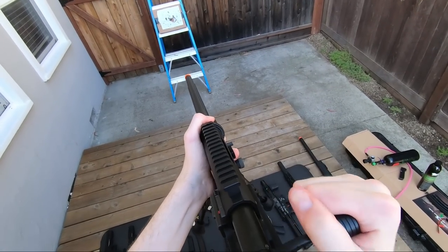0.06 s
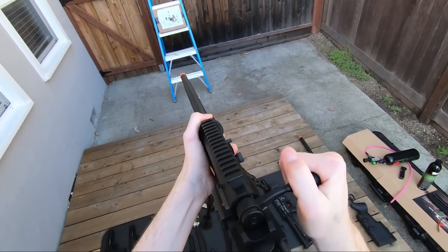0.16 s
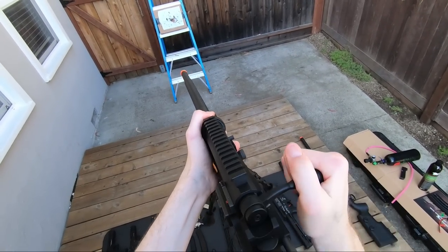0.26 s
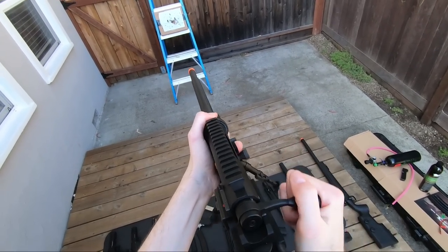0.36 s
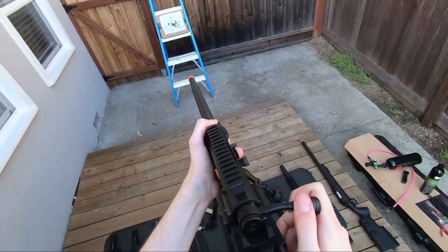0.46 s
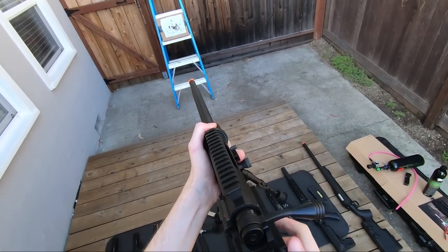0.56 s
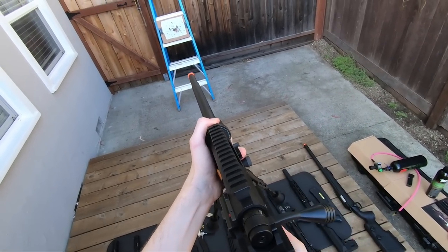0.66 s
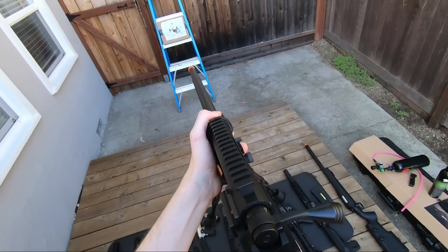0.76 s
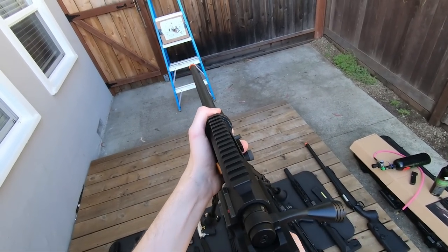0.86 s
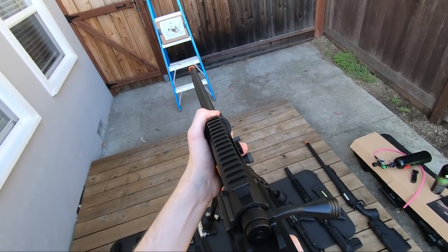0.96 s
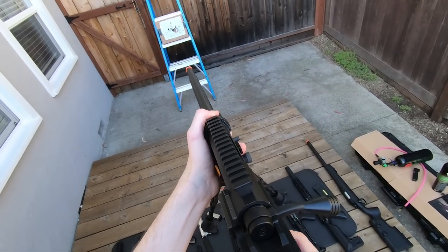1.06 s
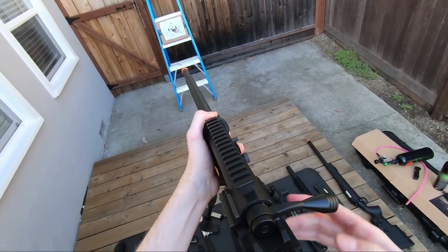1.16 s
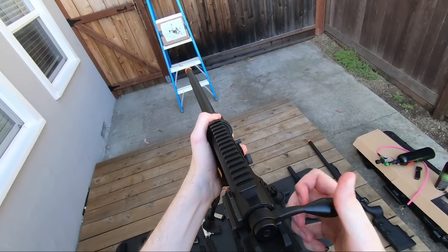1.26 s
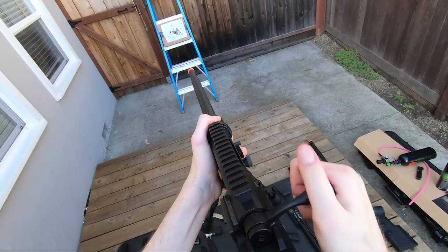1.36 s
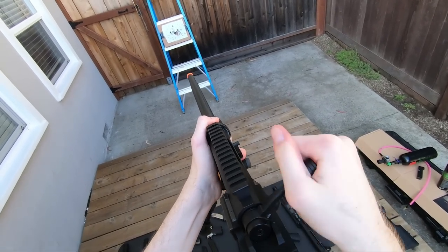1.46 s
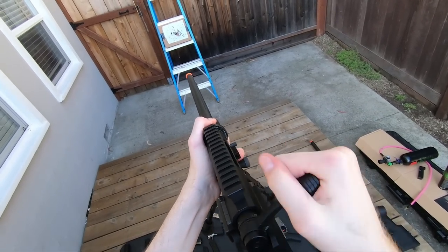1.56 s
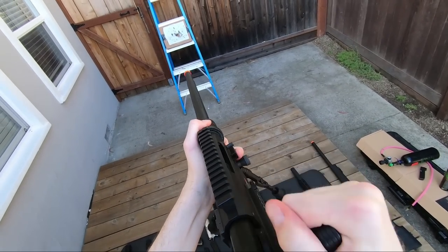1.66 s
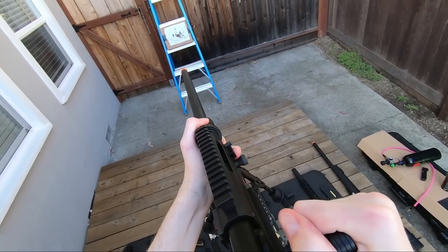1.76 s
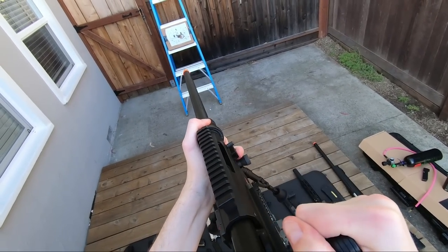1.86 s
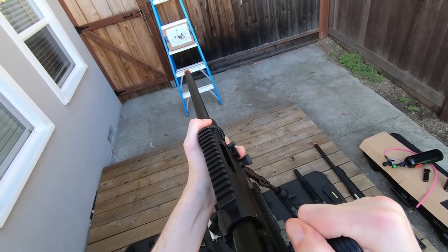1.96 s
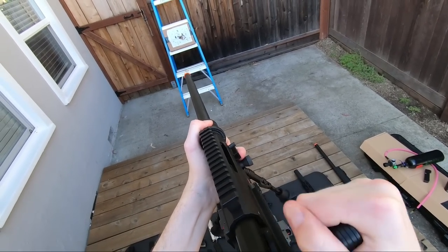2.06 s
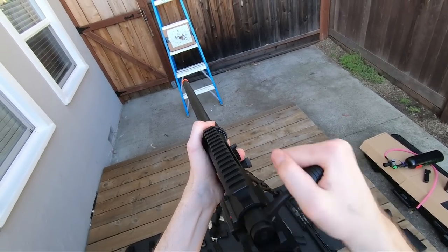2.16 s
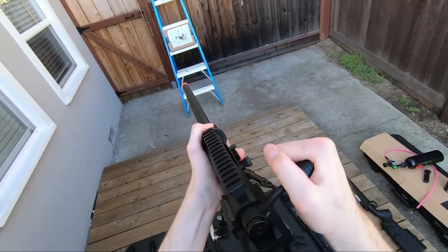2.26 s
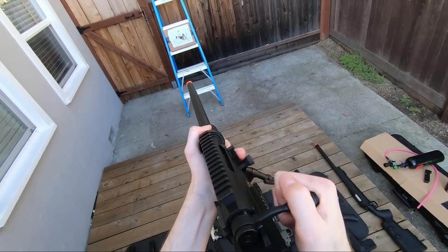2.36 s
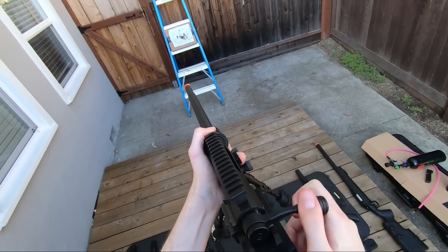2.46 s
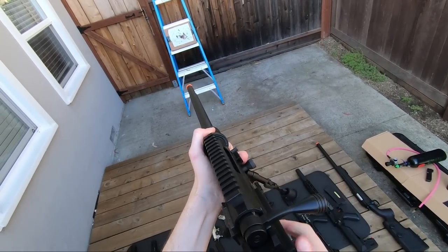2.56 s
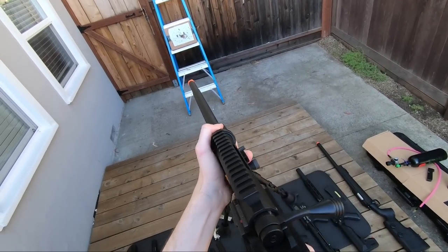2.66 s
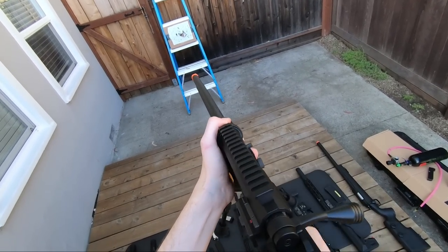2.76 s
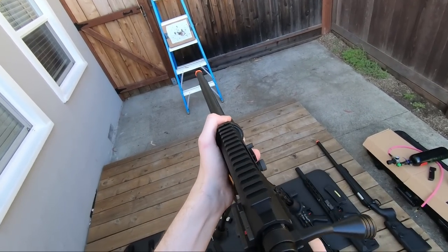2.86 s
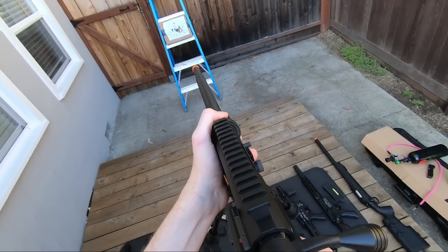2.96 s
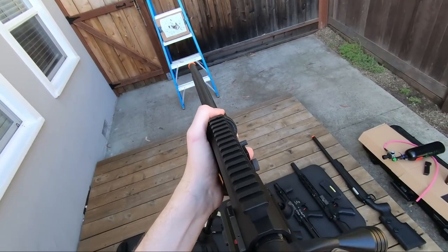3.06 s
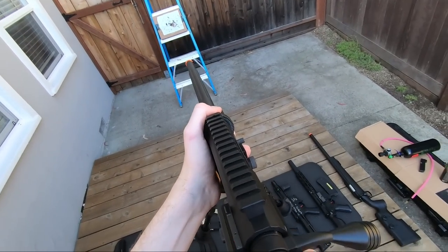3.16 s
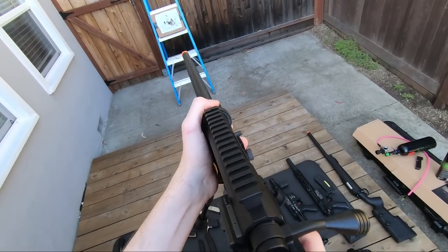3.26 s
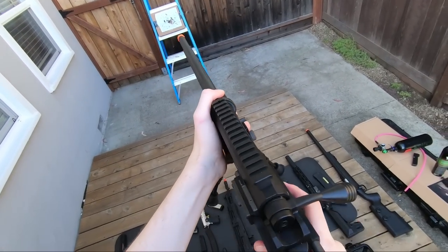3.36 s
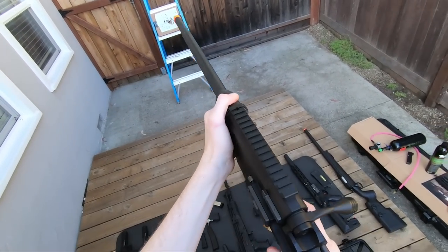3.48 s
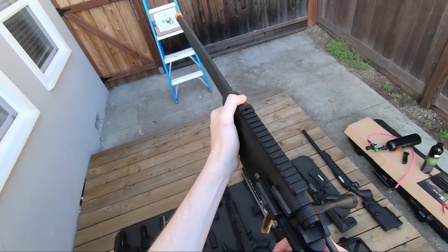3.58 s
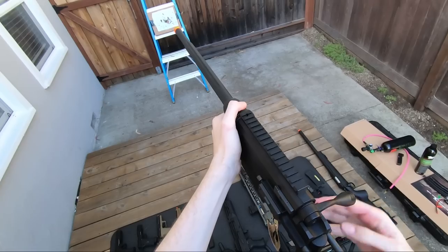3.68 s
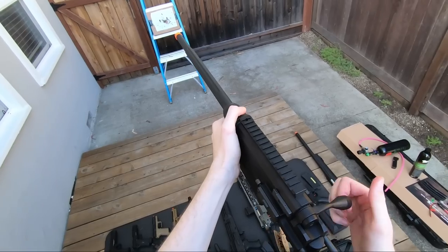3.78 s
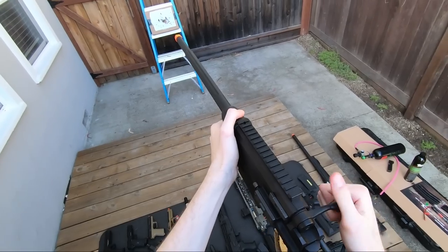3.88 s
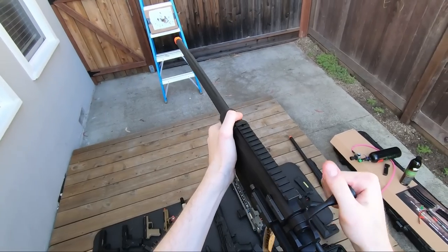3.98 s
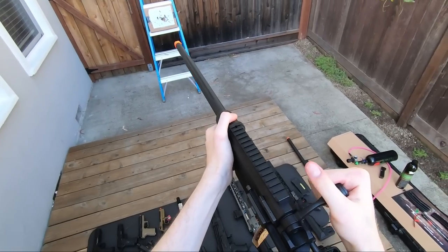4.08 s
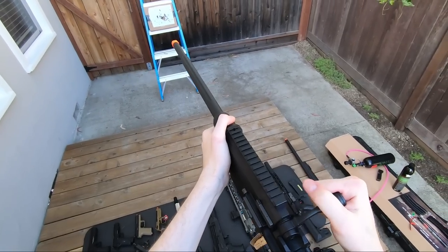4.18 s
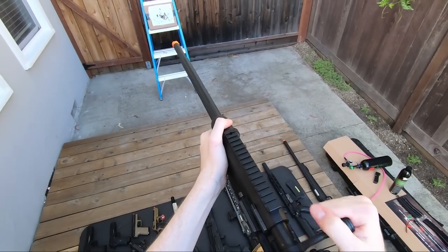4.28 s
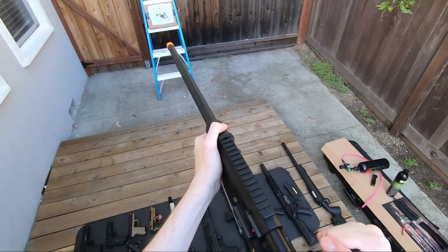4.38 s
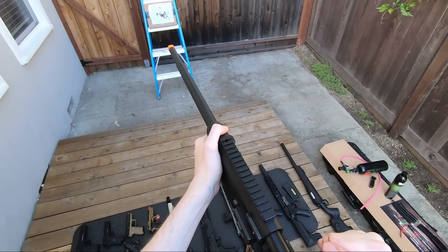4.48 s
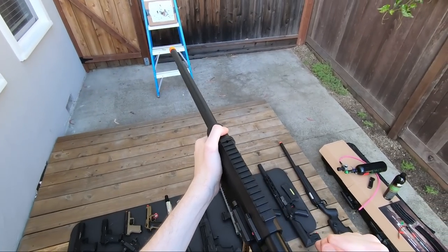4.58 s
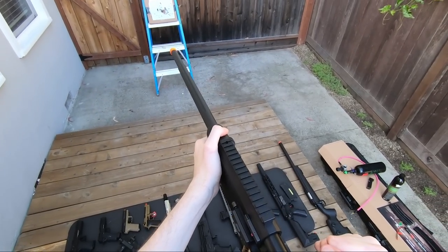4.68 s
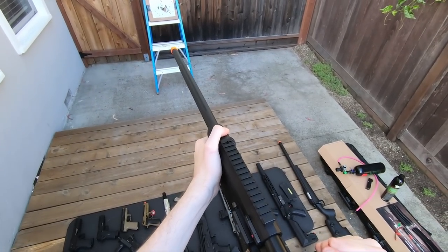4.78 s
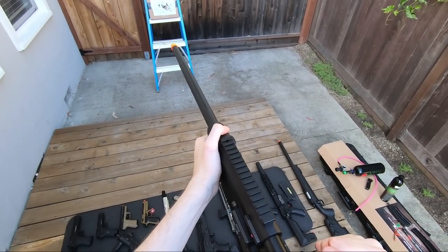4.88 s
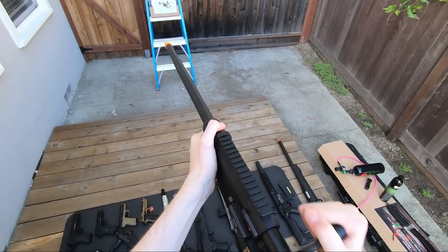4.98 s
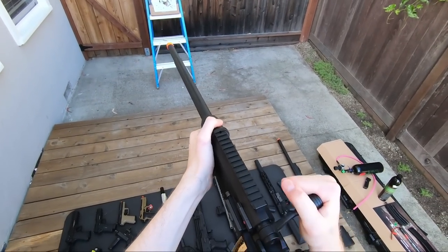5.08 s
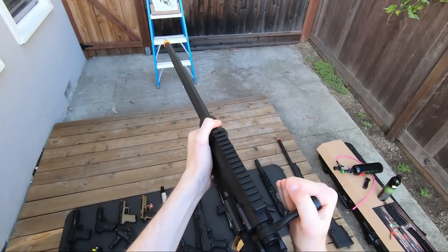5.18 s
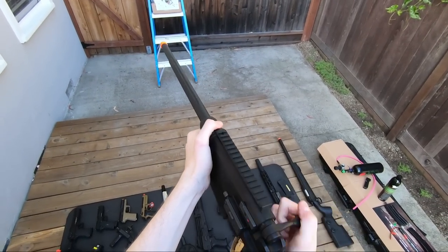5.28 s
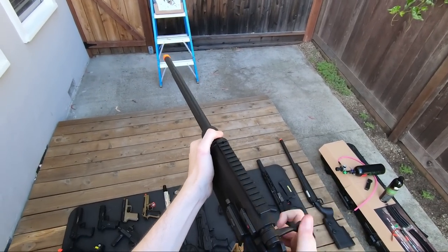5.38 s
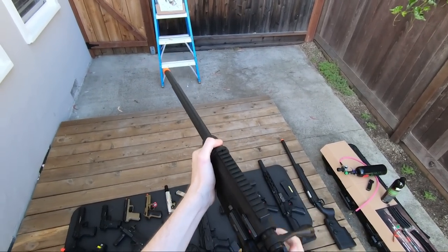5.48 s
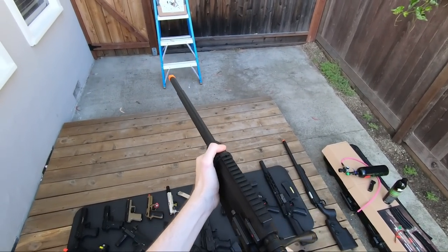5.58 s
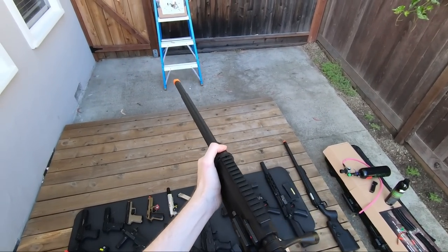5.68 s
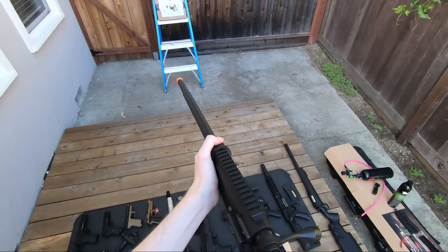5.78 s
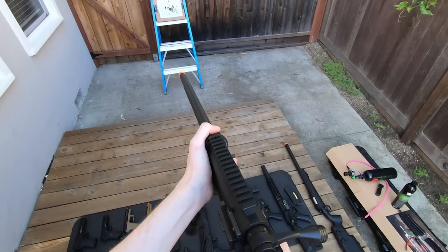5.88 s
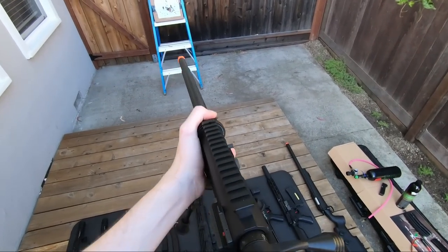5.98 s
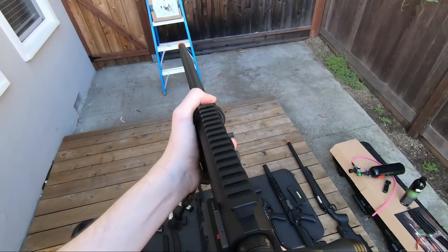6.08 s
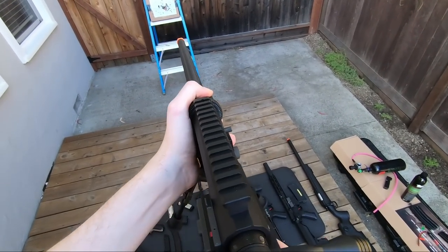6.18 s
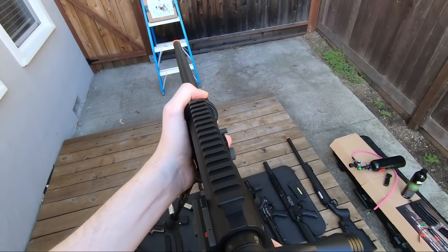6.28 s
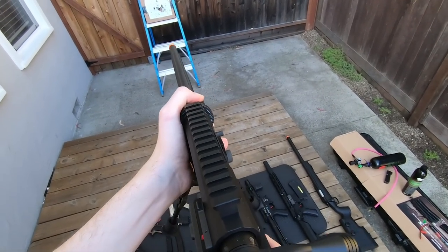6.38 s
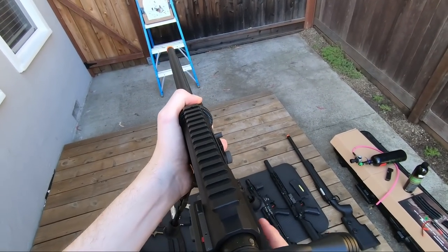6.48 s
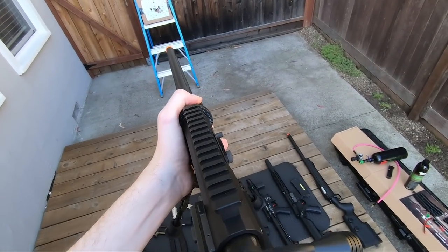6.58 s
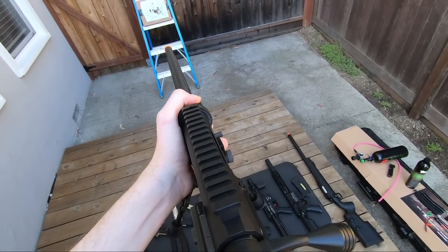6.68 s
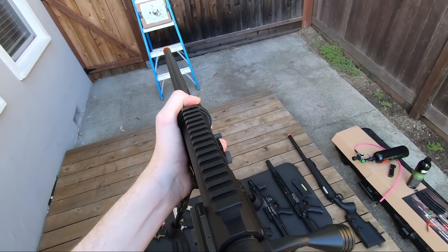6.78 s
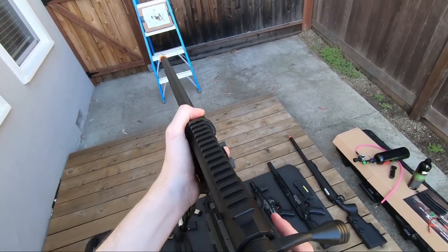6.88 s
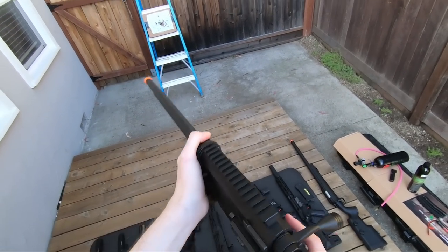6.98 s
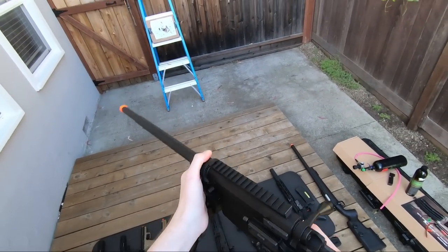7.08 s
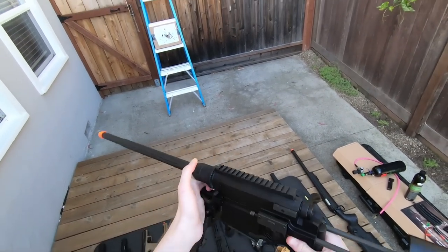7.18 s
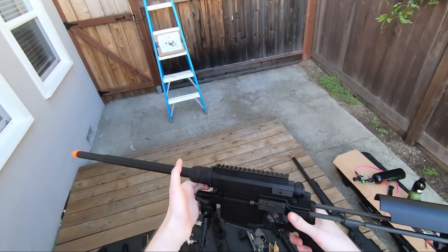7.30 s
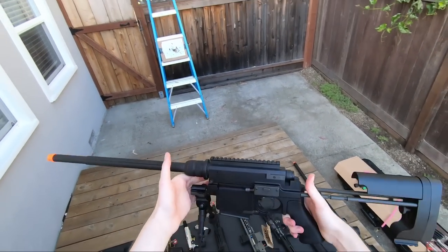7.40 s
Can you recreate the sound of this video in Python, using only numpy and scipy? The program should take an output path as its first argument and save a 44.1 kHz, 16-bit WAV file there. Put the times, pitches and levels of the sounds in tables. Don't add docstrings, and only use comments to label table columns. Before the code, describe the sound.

Close bolt knocks, clicks and slams, then three loud hollow cracks with brief air rush, short yard echoes, and faint fading traffic rumble.

```python
import sys
import numpy as np
from scipy import signal
from scipy.fft import rfft, irfft, next_fast_len
from scipy.io import wavfile
from scipy.ndimage import uniform_filter1d

SR = 44100
rng = np.random.default_rng(int(sys.argv[2]) if len(sys.argv) > 2 else 0)


def to_wav(sig):
    pcm = np.clip(np.atleast_2d(sig), -1, 1) * 32767
    pcm = np.round(pcm).astype(np.int16)
    wavfile.write(sys.argv[1], SR, pcm.T)


def gain_from_db(level_db):
    decades = np.asarray(level_db, float) / 20
    return 10 ** decades


N = 328096
LEFT_RIGHT = np.array([[1], [-1]])

# slam_s, sear_lead_s, strength_db
SHOTS = [
    (1.0289, 0.026, -1),
    (3.2029, 0.022, 0),
    (6.691, .0214, -0.5),
]
# peak_db, ring_hz, stock_db, steel_db, left_minus_right_db
SEAR = (-12, 3200.5, -11, -13, -2)
# lag_s, peak_db, ring_hz
SEAR_PIN = (0.0012, -11, 5000)
# after_slam_s, peak_db, stock_db, steel_db
RATTLE = [
    (-.0105, -33.5, 14.5, -4.5),
    (-.0082, -34, 20, -11),
    (-.0055, -8.5, -0.5, -13),
    (-.0037, -7, -7.5, -7.5),
    (-.0022, -12.5, -8, -8),
    (.0006, 3.5, -14, -13.5),
    (.003, -8.5, -10.5, -5),
    (.0052, -23.5, -8, -6),
]
RATTLE_HZ, REBOUND_PITCH = 3400, 0.58
# start_after_slam_s, end_after_slam_s, start_db, end_db, steel_db
PISTON_RUN = [
    (-.018, -.006, -37.5, -32, -9),
    (-.006, 0.00015, -19.5, -19.5, 13.5),
]
# after_slam_s, width_s, signed_height
POP = [(-.0101, .0008, .12), (-.0092, .0008, -.2), (-.0084, .0007, .08), (-.0077, .0007, -.1),
       (-.0055, .001, .2), (-.004, .001, -.2), (.0007, .0007, .55), (.0013, .0007, -.8),
       (.002, .0013, 1.35), (.0041, .0014, -.85), (.0051, .001, -.25)]
HALF_PULSE = 220
# lag_s, level_db
RETURNS = [(.0037, -21.5), (.0095, -11.5), (0.0152, -12.5), (0.0238, -14.5), (.031, -19), (.039, -23.5),
           (.047, -25.5), (.056, -25.5), (.064, -27), (.074, -29)]
RETURN_CUT_HZ = 340
BLAST_DB, BLAST_T60_S = -26.5, 0.39
BLAST_LOW_FADE_DB_PER_S = 58.5

# start_s, peak_db, ring_hz, steel_db
KNOCKS = [(0.1139, -21, 3070, -26), (0.1998, -18, 2620, -6), (0.203, -13.5, 1300, -27.5),
          (0.2382, -16.5, 2780, -17), (0.428, -18.5, 2930, -19), (0.4338, -14, 2370, -18),
          (0.4578, -14.5, 1880, -24), (0.4612, -26, 2290, -25.5), (0.4929, -29.5, 4230, -18),
          (1.388, -37.5, 3000, -4), (2.515, -36, 3800, -1.5), (4.399, -26, 3010, -13.5),
          (4.411, -26.5, 3400, -21), (6.416, -58.5, 3900, -14), (0.6167, -11.5, 2290, -16.5),
          (1.6638, -8, 2650, -6.5), (1.7116, -10.5, 3423, -9), (1.721, -17, 2960, -16.5),
          (2.458, -9, 3000, -20), (2.466, -9.5, 1940, -21.5), (2.4865, -17, 1890, -21),
          (4.0708, -9, 3120, -22.5), (4.0776, -15.5, 2090, -26), (4.3202, -8.5, 2970, -15.5),
          (5.0162, -18.5, 3920, -20), (5.3569, -7, 2970, -22), (5.5945, -11, 2900, -18)]
# start_s, peak_db, ring_hz, steel_db
CLICKS = [(0.1226, -1.5, 3600, -16.5), (0.4369, -12.5, 2158, -22), (1.1604, -18.5, 2960, -12),
          (1.705, -20.5, 3277, 2), (1.7281, -11.5, 2897, -17.5), (1.7457, -22.5, 3103, -15),
          (1.7524, -8.5, 2530, -12), (1.7572, -11.5, 2750, -17), (1.9615, -2, 3523, -23.5),
          (1.9651, -7.5, 2870, -21), (1.971, -8.5, 3644, -15.5), (2.146, -18.5, 3320, -16.5),
          (2.1507, 0, 3164, -20), (3.3423, -15.5, 3400, -20), (4.364, -20, 3647, -2),
          (4.3707, -6, 3250, -13), (4.431, -21, 2480, -29), (4.4395, -12.5, 3520, -19),
          (4.4888, -4.5, 3480, -17.5), (4.4921, -7, 3120, -22), (4.4935, -2, 3168, -21),
          (5.3898, -10, 1960, -18.5), (5.019, -2.5, 3230, -16), (5.3615, -6, 2330, -33),
          (5.3645, -12, 2430, -17.5), (6.6491, -46, 3530, -6.5), (6.661, -48.5, 3573, 1),
          (6.8885, -25.5, 3983, -7.5)]
# start_s, peak_db, ring_hz, stock_thud_lag_s
SLAMS = [
    (0.246, -1, 2800, .006),
    (2.2598, -2.5, 2983, 0.0064),
    (5.111, -1.5, 2890, .008),
]
# start_s, peak_db, ring_hz
BOUNCES = [(0.1996, -23, 5500), (0.236, -17.5, 2700), (1.665, -19.5, 1500), (1.7125, -21.5, 1400),
           (0.1254, -14.5, 2700), (0.2554, -14.5, 3300), (0.462, -26.5, 3000), (0.6268, -23.5, 3000),
           (1.714, -17, 2990), (1.7188, -20, 1800), (1.7314, -15, 3530), (1.739, -14, 2900),
           (1.7475, -22, 3470), (1.7603, -17.5, 2860), (1.963, -5.5, 2780), (1.9683, -8.5, 2900),
           (1.9718, -15.5, 1700), (1.9747, -17, 2890), (1.977, -14, 2990), (1.9872, -27, 3320),
           (1.9952, -25.5, 3360), (2.144, -23.5, 2130), (2.214, -29, 2090), (2.216, -23, 1280),
           (2.22, -18.5, 2430), (2.2246, -21, 3530), (2.2469, -27, 2450), (2.25, -25, 3700),
           (2.2696, -19.5, 1270), (2.2738, -25, 3080), (2.4596, -11.5, 3100), (2.4637, -16.5, 2560),
           (2.4668, -21, 3900), (3.3443, -26, 2000), (2.2597, -5.5, 1900), (5.1116, -10, 1700),
           (4.3206, -18, 1500), (1.6658, -16.5, 2300), (2.4879, -17, 1900), (4.4428, -19.5, 3190),
           (4.4462, -20.5, 3190), (4.497, -14, 3080), (4.503, -20, 2970), (5.0659, -21.5, 2520),
           (5.1165, -14, 1570), (5.123, -19.5, 3190), (5.3592, -10.5, 2900), (5.3742, -21.5, 1590),
           (5.3772, -27, 2670), (5.391, -19, 4200), (5.392, -22, 1770), (5.3947, -17.5, 1770),
           (5.404, -24, 3230)]
# start_s, peak_db, ring_hz, steel_db
TICKS = [(0.168, -46.5, 2070, -12), (0.537, -38, 3415, -17), (0.571, -31, 3660, -16),
         (0.6107, -27.5, 1880, -16), (1.398, -27, 2550, -19), (1.445, -32.5, 3100, -17),
         (1.493, -33.5, 4300, -3), (1.51, -30, 3260, -18.5), (1.606, -25.5, 1960, -29),
         (1.8123, -29.5, 3510, -3), (2.3778, -29, 3450, -8), (2.697, -38, 2960, -17.5),
         (3.4864, -37, 3330, -20), (3.5688, -30, 3370, -6.5), (3.6646, -26, 3120, -28.5),
         (3.7059, -37.5, 3090, -23), (3.947, -39.5, 2420, -21.5), (3.9537, -35, 2850, -17),
         (4.064, -26.5, 2950, -9.5), (4.1354, -32, 3480, -9), (5.0722, -32, 3140, -5),
         (5.2919, -45.5, 3000, -4.5), (5.3132, -30, 3500, -16), (5.682, -40.5, 2625, -19),
         (7.1065, -46.5, 4000, -23), (7.163, -49, 4050, -20), (6.415, -53.5, 4200, -18.5),
         (7.31, -34.5, 3180, -6.5), (7.3449, -37.5, 3800, -11), (7.3603, -46.5, 1690, -9),
         (7.386, -29, 1970, -17), (7.425, -37, 4430, -15)]
REBOUND_S, REBOUND_DB, REBOUND_HZ = .0017, -8, 3120
THUD_DB, THUD_HZ, THUD_STOCK_DB, THUD_STEEL_DB = -7.5, 2800, 4, -6
SLAM_STOCK_DB, SLAM_STEEL_DB = -7, -5
KNOCK_STOCK_DB, CLICK_STOCK_DB = -7.5, -16.5
BOUNCE_STOCK_DB, BOUNCE_STEEL_DB = -19, -20
HANDLE_PAN_DB = -1

# pitch_hz, width_hz, level_db
RECEIVER = [(1886, 67, -7), (2800, 38, -4.5), (2960, 16, -5.5), (3320, 140, -3.5), (3800, 41, -6.5),
            (4100, 36, -9.5), (4800, 49, -9), (6360, 120, -14.5), (9200, 46, -13.5)]
STOCK_HZ, STEEL_HZ = 894, 9200
# pitch_hz, width_hz, level_db
BOLT_MODES = [(8800, 120, 6), (9320, 100, 6), (9900, 100, 4.5)]

KNOCK_CHATTER_DB, CLICK_CHATTER_DB, SLAM_CHATTER_DB = -20.5, -30.5, -22.5
CHATTER_LAG_S, CHATTER_S, CHATTER_FALL_DB, CHATTER_BRIGHT_DB, CHATTER_PITCH = 0.0046, 0.043, 21.5, 5, 0.73
# start_s, end_s, start_db, end_db
STROKES = [(0.11, 0.119, -53, -30.5), (0.213, 0.248, -32, -26), (1.388, 1.405, -45, -46),
           (1.499, 1.532, -44, -46), (1.631, 1.661, -53.5, -32), (1.702, 1.75, -34, -32.5),
           (1.95, 1.965, -44, -29), (2.141, 2.149, -33, -33), (2.213, 2.255, -37, -28),
           (2.667, 2.787, -53, -57.5), (2.866, 2.939, -60, -52), (4.286, 4.325, -43.5, -29.5),
           (4.375, 4.459, -33, -39.5), (4.478, 4.488, -51, -24), (5.008, 5.025, -41.5, -39.5),
           (5.068, 5.109, -37, -33), (5.311, 5.336, -46, -51.5), (5.562, 5.602, -48, -42),
           (7.303, 7.344, -56, -58), (7.395, 7.44, -43, -65)]
STROKE_STEEL_DB, STROKE_HZ, STROKE_ATTACK_S = -14.5, 2750, 0.011
# start_s, end_s, start_db, end_db, bright_db
RUSTLE = [
    (1.058, 1.298, -51.5, -50, -15),
    (1.304, 1.61, -59, -54, -5),
    (5.775, 5.88, -62.5, -67, -10),
    (6.397, 6.426, -65, -72, 4.5),
    (6.456, 6.526, -63.5, -70.5, 0),
    (7.162, 7.164, -59.5, -58, -13.5),
]
RUSTLE_HZ = 3600
GRIT_PER_S, GRIT_SPREAD_DB = 5000, 3.4

# start_s, level_db, pitch_hz
LATCHES = [
    (0.1253, -37, 2650),
    (1.975, -34.5, 3290),
    (2.151, -39, 2630),
    (4.497, -31, 3050),
    (5.021, -28, 2663),
]
CYLINDER_T60_S, CYLINDER_WIDTH_HZ = 0.24, 82
# start_s, level_db
TRIGGER = [
    (6.8885, -20.5),
    (6.9, -37),
    (6.905, -39),
    (6.9133, -40),
    (6.92, -42),
]
# pitch_hz, level_db, t60_s
TRIGGER_MODES = [(1800, -4.5, 0.013), (3140, 1, 0.0099), (4200, 0, 0.01), (5640, -10, .008),
                 (6600, -14, 0.0091)]
TRIGGER_BLOWS_S = (0, 0.00122, .0026)

# pitch_hz, t60_s
YARD_T60 = [(100, 0.1), (700, 0.6), (2500, 0.22), (9000, 0.49), (13000, 0.36)]
# start_s, length_s, pitch_hz, peak_db
PEEPS = [
    (0.493, 0.017, 5300, -56),
    (2.06, 0.076, 5400, -60),
    (2.63, 0.07, 5040, -62),
    (2.887, 0.045, 5050, -66),
    (3.88, 0.11, 5070, -66.5),
    (4.631, .06, 5120, -67),
    (6.326, 0.14, 5030, -63.5),
]
PEEP_ONSET_PITCH, PEEP_ATTACK, PEEP_RISE_DB, PEEP_FALL_DB = 1.11, 0.17, 22.5, 13.5
STRAND_DB, STRAND_RISE = -5, 1.07

# start_s, far_engine_db, traffic_moving_off_db
STREET = [(0.0, -37, -32.5), (0.62, -39.5, -39.5), (0.931, -37, -41), (1.24, -43, -48), (1.55, -44.5, -45),
          (1.86, -36, -46.5), (2.3, -42, -47), (2.788, -40, -45), (3.41, -51, -49.5), (4.029, -51.5, -49.5),
          (4.34, -63.5, -49), (4.65, -43, -50), (5.27, -58, -51), (5.89, -54.5, -52), (6.51, -63, -53),
          (6.82, -60.5, -56.5), (7.44, -73, -55)]
STREET_EDGES_HZ = (62, 124, 350, 5600)
# pitch_hz, level_db_per_hz
FLOOR = [(26, -2.5), (37, 0), (52, -6), (148, -6), (296, -12.5), (420, -20), (840, -17), (1180, -19.5),
         (1670, -25.5), (2370, -30), (4700, -37), (6700, -35), (9500, -37), (13400, -61)]
# pitch_hz, likeness
LIKENESS = [(60, 0.84), (180, 0.99), (550, 0.75), (1650, 0.32), (5000, 0.1), (12000, 0.11)]
# start_s, pitch_hz
ENGINE_HZ = [(0, 38.95), (1.1, 36.75), (3.0, 36.02), (4.7, 33.8), (6.3, 29.55), (7.44, 29.3)]
# multiple, level_db
ORDERS = [(1, -1), (2, -14), (3, -14)]
RUMBLE_DB = -4.5
ROAR_DB, ROAR_FOLLOWS = -47.5, 0.79
THROB_DB, THROB_FADE_DB_PER_S, THROB_GUST = -49.5, 4, 0.43
THROB_FLOOR_DB = -25
REV_S, REV_LENGTH_S, REV_DB = 0.77, 0.25, 8.5
HISS_DB, HISS_FADE_DB_PER_S = -54, 3

# pitch_hz, level_db
MICROPHONE = [(60, -0.9), (500, 0.1), (6000, -1.68), (10000, -8), (11400, -22), (12600, -21.5),
              (14700, -21.5), (15400, -33.5), (16000, -45)]
# pitch_hz, rms_db
HUM = [(8180, -94), (10200, -96)]


def rms_one(x):
    return x / np.sqrt(np.mean(x ** 2) + 1e-20)


def peak_one(x):
    return x / np.abs(x).max()


def at_hz(points, hz):
    table_hz, value = np.transpose(points)
    return np.interp(np.log(hz), np.log(table_hz), value)


def band(x, low_hz, high_hz, order=2):
    return signal.sosfilt(signal.butter(order, [low_hz, high_hz], "band", fs=SR, output="sos"), x)


def resonate(x, hz, width_hz):
    r = np.exp(-np.pi * width_hz / SR)
    top = np.array([1, 0, -1]) * (1 - r * r) / 2
    return signal.lfilter(top, [1, -2 * r * np.cos(2 * np.pi * hz / SR), r * r], x)


def drift(rate):
    knots = rng.standard_normal(int(N / SR * 40) + 2)
    return np.interp(np.arange(N) / SR * rate, np.arange(len(knots)), knots)


def stereo(mid, side, alike):
    return np.sqrt(1 + alike) * mid + np.sqrt(1 - alike) * side * LEFT_RIGHT


def add(out, s, sound):
    at = round(s * SR)
    out[..., at:at + sound.shape[-1]] += sound[..., :N - at]


def bump(width_s):
    t = np.arange(-HALF_PULSE, HALF_PULSE) / SR
    return np.cos(np.pi * np.clip(t / width_s, -.5, .5)) ** 2


def clack(ring, contact, stock, broad, steel, db, hz, stock_db, steel_db, pan_db):
    receiver = resonate(resonate(contact, hz, 560.0), hz, 2100.0)
    receiver = receiver + 0.21 * (hz / 3000) ** 2 * broad
    receiver = receiver + ring * resonate(contact, hz * .9, 220.)
    mix = peak_one(receiver) + gain_from_db(stock_db - 2.0) * peak_one(stock) + gain_from_db(steel_db + 8.0) * peak_one(steel)
    return gain_from_db(db + 2.5 + pan_db / 2 * LEFT_RIGHT) * mix


def contacts(rows, alike=0.92, ring=0.98, spread=0.97):
    out, scuff_s = np.zeros((2, N)), 0.00084
    mid, side = rng.standard_normal((len(rows), 2, 1, 1500)).swapaxes(0, 1)
    t = np.arange(mid.shape[-1]) / SR
    scuff = t / scuff_s * np.exp(1 - t / scuff_s * 2)
    contact = stereo(mid, side, alike) * (scuff + gain_from_db(-16.0) * np.exp(-t / 0.0045))
    wide = contact + .5 * (contact - contact[:, ::-1])
    stock = resonate(resonate(wide, STOCK_HZ, 900.), STOCK_HZ, 1500.) + .25 * band(wide, 830, 1200)
    broad = spread * band(contact, 1500, 4900, order=3)
    steel = resonate(wide, STEEL_HZ, 660.0) + 1.6 * band(wide, 7000, 15000)
    for hz, width_hz, db in BOLT_MODES:
        steel = steel + gain_from_db(db) * resonate(wide, hz, width_hz)
    for (s, *how), *parts in zip(rows, contact, stock, broad, steel):
        add(out, s, clack(ring, *parts, *how))
    return out


def shots():
    rows, air = [], np.zeros(N)
    pin_lag_s, *pin = SEAR_PIN
    for s, lead_s, db in SHOTS:
        rows.append((s - lead_s, *SEAR))
        rows.append((s - lead_s + pin_lag_s, *pin, *SEAR[2:]))
        for after, level_db, stock_db, steel_db in RATTLE:
            hz = RATTLE_HZ * (REBOUND_PITCH if after > .002 else 1)
            rows.append((s + after, level_db + db, hz, stock_db, steel_db, 0))
        for after, width_s, height in POP:
            add(air, s + after - HALF_PULSE / SR, gain_from_db(db) * height * bump(width_s))
    dull = signal.sosfilt(signal.butter(2, RETURN_CUT_HZ, fs=SR, output="sos"), air)
    for lag_s, db in RETURNS:
        air = air - gain_from_db(db) * np.roll(dull, round((lag_s - .0005) * SR))
    air = signal.sosfilt(signal.butter(1, 40., "high", fs=SR, output="sos"), air)
    return contacts(rows, alike=0.79, ring=0.66) + air


def blast():
    out = np.zeros((2, N))
    t = np.arange(SR // 2) / SR
    for s, *_ in SHOTS:
        mid, side = rng.standard_normal((2, len(t)))
        wide = mid + 0.68 * side * LEFT_RIGHT
        rush = rms_one(band(wide, 540, 5500)) + gain_from_db(-5.5) * rms_one(band(wide, 5500, 15000))
        rumble = rms_one(band(mid + 0.14 * rush, 98, 470))
        rush = rush + gain_from_db(-1.5 - BLAST_LOW_FADE_DB_PER_S * t) * rumble
        add(out, s + 0.0059, gain_from_db(BLAST_DB - 60 * t / BLAST_T60_S) * rush)
    return out


def bolt_contacts():
    rows = [(s, db, hz, KNOCK_STOCK_DB, steel_db, KNOCK_CHATTER_DB) for s, db, hz, steel_db in KNOCKS]
    rows += [(s, db, hz, CLICK_STOCK_DB, steel_db, CLICK_CHATTER_DB) for s, db, hz, steel_db in CLICKS]
    for s, db, hz, lag_s in SLAMS:
        rows.append((s, db, hz, SLAM_STOCK_DB, SLAM_STEEL_DB, SLAM_CHATTER_DB - 15.5))
        for k in (1, 2):
            rows.append((s + k * REBOUND_S, db + k * REBOUND_DB, REBOUND_HZ, KNOCK_STOCK_DB, SLAM_STEEL_DB,
                         SLAM_CHATTER_DB - 19.0))
        rows.append((s + lag_s, db + THUD_DB, THUD_HZ, THUD_STOCK_DB, THUD_STEEL_DB, SLAM_CHATTER_DB - THUD_DB))
    return [(*row, HANDLE_PAN_DB) for *row, _ in rows], [row[-1] for row in rows]


def frictions():
    rows = []
    for (s, db, hz, _, steel_db, _), below_db in zip(*bolt_contacts()):
        start, level_db = s + CHATTER_LAG_S, db + below_db
        rows.append((start, start + CHATTER_S, level_db, level_db - CHATTER_FALL_DB,
                     steel_db + CHATTER_BRIGHT_DB, hz * CHATTER_PITCH))
    rows += [(*row, STROKE_STEEL_DB, STROKE_HZ) for row in STROKES]
    rows += [(*row, RUSTLE_HZ) for row in RUSTLE]
    rows += [(s + a, s + b, *levels, 3000.) for s, *_ in SHOTS for a, b, *levels in PISTON_RUN]
    return sorted(rows)


def slides():
    gain, steel, ring_hz = np.zeros(N), np.zeros(N), np.full(N, 2800.)
    fade_s, focus_db_per_octave = 0.013, 8.0
    for start, end, db_start, db_end, steel_db, hz in frictions():
        length = end - start
        t = np.arange(0, length + fade_s, 1 / SR)
        level = np.interp(t, [0, length, length + fade_s], [db_start, db_end, db_end - 54.5])
        add(gain, start, gain_from_db(level))
        add(steel, start, gain_from_db(level + steel_db + 2.5) * np.minimum(t / STROKE_ATTACK_S, 1))
        ring_hz[round(start * SR):] = hz
    sizes = gain_from_db(GRIT_SPREAD_DB * np.minimum(rng.exponential(1, (2, N)), 4.5))
    sizes = sizes * rng.choice([-1, 1], (2, N))
    mid, side = (rng.random((2, N)) < GRIT_PER_S / SR) * sizes
    grit = (mid + 0.6 * side * LEFT_RIGHT) * gain_from_db(2.0 * drift(39.)) + 1e-18
    body = 0
    for k, (hz, width_hz, db) in enumerate(RECEIVER):
        swell_db = 3 * drift(18.)
        level = db / 2 + swell_db - focus_db_per_octave * np.abs(np.log2(hz / ring_hz))
        body = body + (-1) ** k * gain_from_db(level) * resonate(grit, hz, 160.0 + width_hz)
    body = rms_one(body) + gain_from_db(-3) * rms_one(band(grit, 1000, 5200, order=3))
    hiss = 0.25 * resonate(grit, STEEL_HZ, 1500.) + band(grit, 5400, 15000)
    return gain * rms_one(body) + steel * rms_one(hiss)


def cylinder():
    out, t = np.zeros(N), np.arange(SR // 4) / SR
    for s, db, hz in LATCHES:
        ring = rms_one(resonate(rng.standard_normal(len(t)), hz, CYLINDER_WIDTH_HZ))
        add(out, s, gain_from_db(db - 60 * t / CYLINDER_T60_S) * ring)
    return out


def trigger():
    out, t = np.zeros(N), np.arange(SR // 10) / SR
    for s, db in TRIGGER:
        for hz, level_db, t60 in TRIGGER_MODES:
            fade = gain_from_db(db + level_db - 60 * t / t60) * np.minimum(t / .0004, 1)
            for lag_s in TRIGGER_BLOWS_S:
                add(out, s + lag_s, fade * np.sin(2 * np.pi * hz * t))
    return out


def yard(x, wet_db):
    t, tail = np.arange(SR // 2) / SR, 0
    for hz in 100 * 2 ** np.arange(0, 7.5):
        mid, side = rng.standard_normal((2, len(t)))
        noise = band(mid + 0.6 * side * LEFT_RIGHT, hz / 2 ** .5, hz * 2 ** .5)
        tail = tail + noise * gain_from_db(-60 * t / at_hz(YARD_T60, hz))
    tail = tail * np.clip(t / 0.0057, 0, 1) ** 2
    tail = tail / np.sqrt(np.sum(tail[0] ** 2))
    return gain_from_db(wet_db) * signal.fftconvolve(x, tail, axes=1)[:, :N]


def bird():
    out = np.zeros(N)
    for start, length, note_hz, peak_db in PEEPS:
        s = start + length * np.array([0, PEEP_ATTACK, 1])
        t = np.arange(s[0], s[-1], 1 / SR)
        db = np.interp(t, s, peak_db - np.array([PEEP_RISE_DB, 0, PEEP_FALL_DB]))
        hz = np.interp(t, s, note_hz * np.array([PEEP_ONSET_PITCH, 1, 1]))
        rough = uniform_filter1d(rng.standard_normal(len(t)), size=150)
        hz = hz * (1 + .006 * np.sin(2 * np.pi * 45. * t) + .16 * rough)
        strand_hz = hz * np.interp(t, s, [1, 1, STRAND_RISE])
        voice = np.sin(2 * np.pi * np.cumsum(hz) / SR)
        strand = np.sin(2 * np.pi * np.cumsum(strand_hz) / SR)
        fade = np.clip(np.minimum(t - t[0], t[-1] - t) / .006, 0, 1)
        fade = fade * (1 + 0.53 * np.cos(2 * np.pi * 24.0 * (t - s[1])))
        add(out, s[0], np.sqrt(2) * gain_from_db(db) * fade * (voice + gain_from_db(STRAND_DB) * strand))
    return out


def street_levels():
    t = np.arange(N) / SR
    s, gust, traffic = np.transpose(STREET)
    gust, traffic = np.interp(t, s, gust), np.interp(t, s, traffic)
    rev = REV_DB * np.exp(-((t - REV_S) / REV_LENGTH_S) ** 4)
    throb = THROB_DB - THROB_FADE_DB_PER_S * t + THROB_GUST * (gust - gust.mean()) + rev
    throb = np.maximum(throb, traffic + THROB_FLOOR_DB)
    roar = ROAR_DB + ROAR_FOLLOWS * (traffic + 48)
    return gust + RUMBLE_DB, throb, traffic, roar, HISS_DB - HISS_FADE_DB_PER_S * t


def engine():
    rumble, throb, *_ = street_levels()
    firing_hz = np.interp(np.arange(N) / SR, *np.transpose(ENGINE_HZ))
    phase = 2 * np.pi * np.cumsum(firing_hz) / SR
    out = np.zeros(N)
    for k, db in ORDERS:
        level = rumble - RUMBLE_DB if k == 1 else throb + 12.0
        level = level + db + 2 * drift(5.8)
        out += np.sqrt(2) * gain_from_db(level) * np.sin(k * phase + 0.51 * drift(3.8))
    return out


def street():
    groups, edges = np.zeros((5, 2, N)), 22 * 2 ** np.arange(0, 9.6, .5)
    white = rng.standard_normal((2, 2, N + SR // 2))
    for k, (low, high) in enumerate(zip(edges, edges[1:])):
        mid, side = band(white[k % 2], low, high, order=3)[:, SR // 2:]
        hz = np.sqrt(low * high)
        alike = np.clip(at_hz(LIKENESS, hz), 0, 1)
        gain = gain_from_db(at_hz(FLOOR, hz) + 1.67 * drift(6.0))
        groups[np.searchsorted(STREET_EDGES_HZ, hz)] += gain * stereo(mid, side, alike)
    return sum(gain_from_db(db) * rms_one(group) for group, db in zip(groups, street_levels()))


def scene():
    ticks = [(s, db, hz, -14, steel_db - 3.5, -1.0) for s, db, hz, steel_db in TICKS]
    bounces = [(*row, BOUNCE_STOCK_DB, BOUNCE_STEEL_DB, HANDLE_PAN_DB) for row in BOUNCES]
    blows, _ = bolt_contacts()
    bolt = contacts(blows + bounces) + contacts(ticks, spread=.3)
    fired, blade = shots(), trigger()
    air = blast() + slides() + cylinder()
    peeps = gain_from_db(-0.5) * bird()
    echoes = yard(bolt + blade / 3 + air + fired / 4 + 4.6 * peeps, wet_db=-13.0)
    traffic = street() * gain_from_db(-.4 * LEFT_RIGHT) + engine()
    return bolt + blade + fired + air + echoes + traffic + peeps


def low_pass(x):
    return signal.sosfilt(signal.butter(12, 16270, fs=SR, output="sos"), x)


def record(dry):
    size = next_fast_len(N)
    hz = np.maximum(np.fft.rfftfreq(size, 1 / SR), 1)
    x = irfft(rfft(dry, size) * gain_from_db(at_hz(MICROPHONE, hz)), size)[:, :N]
    for tone_hz, db in HUM:
        x = x + np.sqrt(2) * gain_from_db(db) * np.sin(2 * np.pi * tone_hz * np.arange(N) / SR)
    overloaded = np.clip(x, -.99, .99)
    return low_pass(overloaded)


dry = scene()
out = record(dry)
to_wav(out)
```